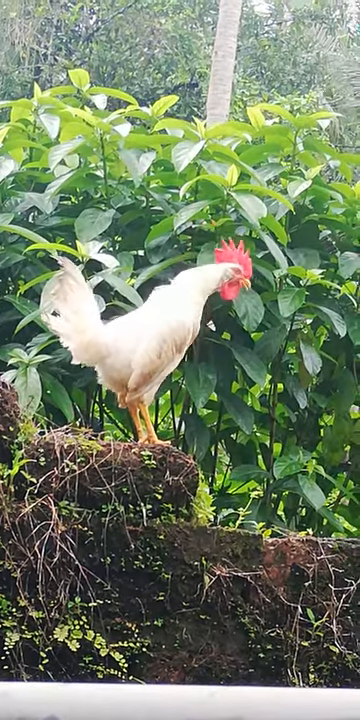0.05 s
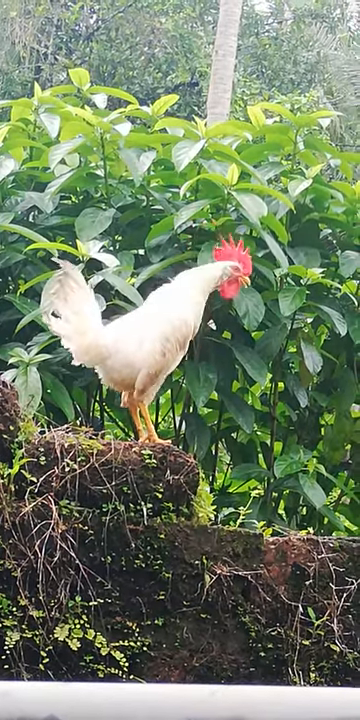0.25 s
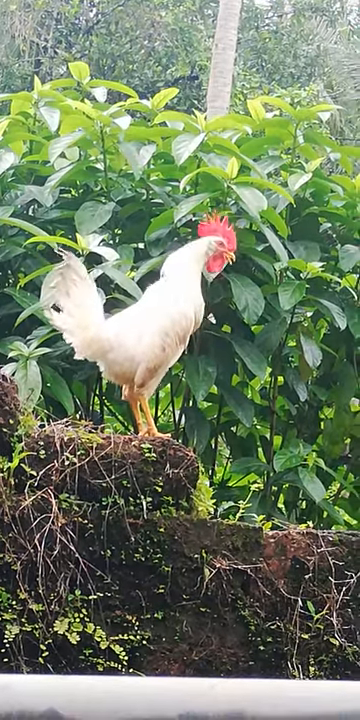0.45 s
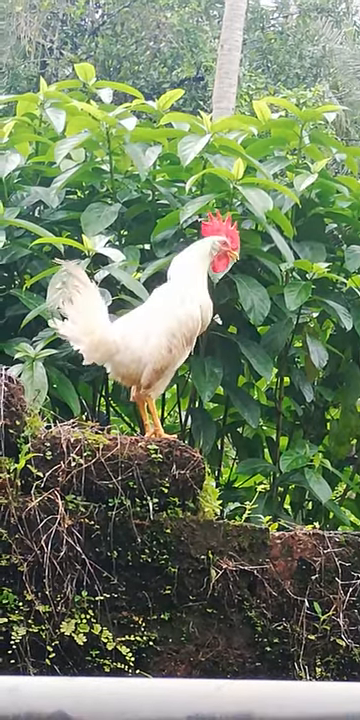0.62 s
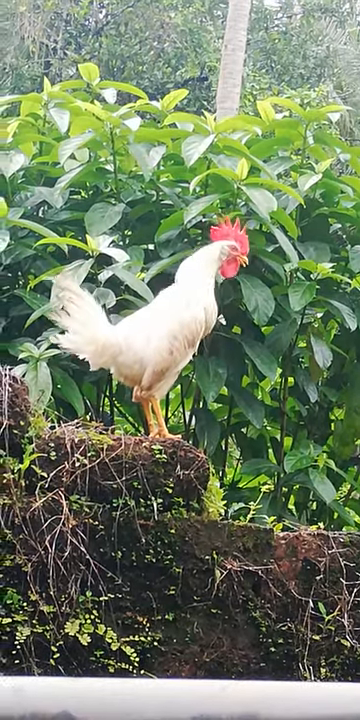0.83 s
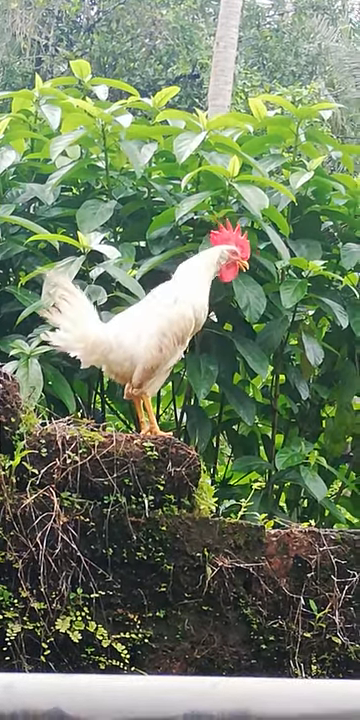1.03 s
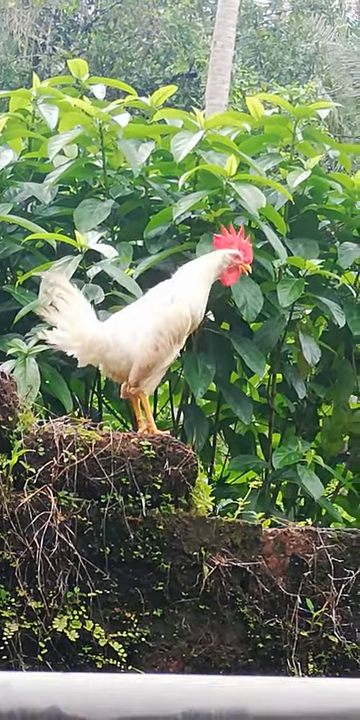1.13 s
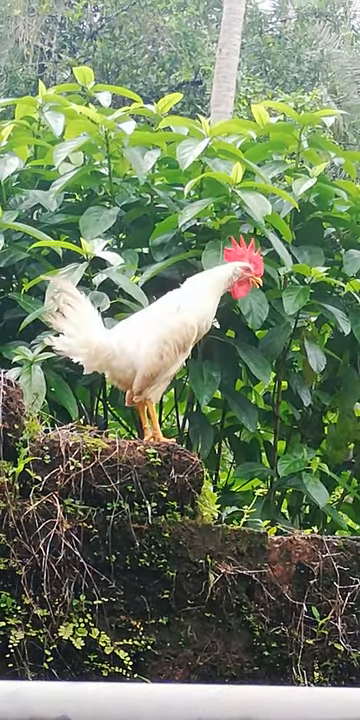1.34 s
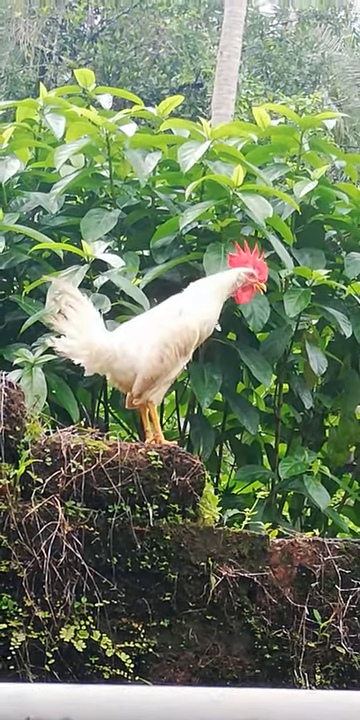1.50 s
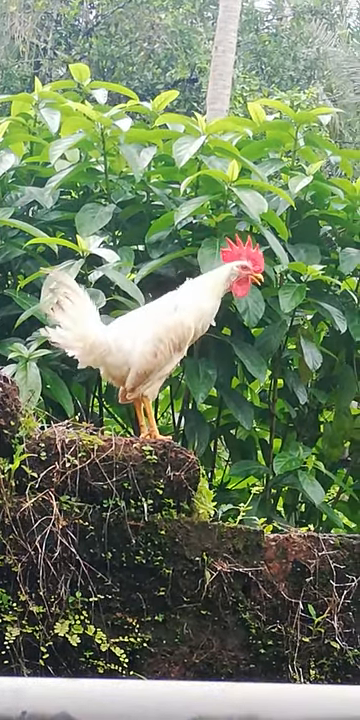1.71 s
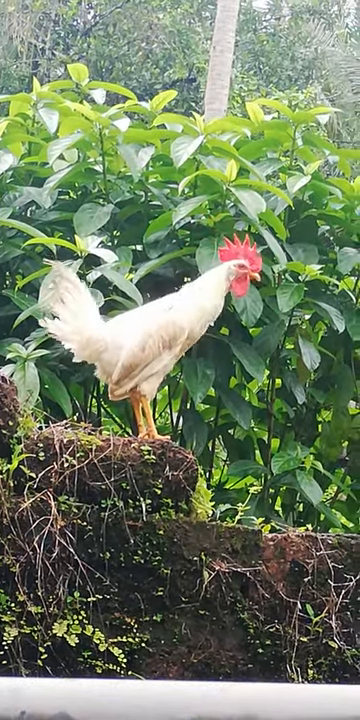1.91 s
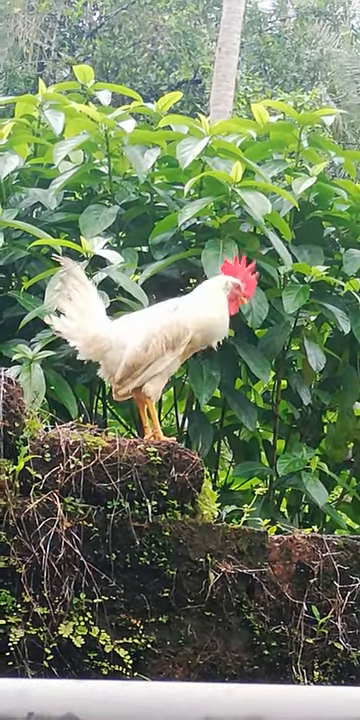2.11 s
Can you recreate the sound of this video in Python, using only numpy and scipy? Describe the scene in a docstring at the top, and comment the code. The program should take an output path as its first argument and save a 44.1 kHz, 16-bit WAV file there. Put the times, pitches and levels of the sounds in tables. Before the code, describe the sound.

A rooster crows once in a garden, a few metres away. A short hoarse note starts at about 0.2 seconds. From 0.6 seconds a long note follows, breaking into a rasp several times, then clearing to a steady tone around 1.2 seconds. It drops in pitch and ends at 1.8 seconds, leaving a short echo. Quiet outdoor air and faint insects continue underneath.

```python
"""A rooster crowing in a garden

One crow, a few metres away: a short hoarse note, then a long one that breaks into a rasp four times,
clears to a pure held tone and drops in pitch as the air runs out. Regular vibration of the syrinx gives
the tone, irregular pulses give the rasp, and throat and beak filter both. Walls and trees return a
short echo; behind it are quiet air, faint insects and a thin far-off tone."""
import sys
import numpy as np
from scipy import signal
from scipy.fft import rfft, irfft
from scipy.io import wavfile

SR = 44100
rng = np.random.default_rng(int(sys.argv[2]) if len(sys.argv) > 2 else 0)


def waveform_to_disk(signal):
    """Save audio, clipped to [-1, 1], as 16-bit WAV at the path in sys.argv[1]."""
    frames = np.transpose(np.atleast_2d(signal))
    scaled = np.clip(frames, -1, 1) * 32767
    samples = np.round(scaled).astype(np.int16)
    wavfile.write(sys.argv[1], SR, samples)


N = 94815

# Spectrum of the outdoor air. Each row: frequency in Hz, relative level in dB.
AIR_SPECTRUM = [(25, -1), (70, -2.5), (150, -5), (400, -9.5), (800, -11), (1400, -9.5), (3200, -16.5),
                (5500, -14), (8000, -16.5), (9500, -16.5), (10500, -29), (13000, -24.5), (15500, -46.5)]
# Partials of the far-off tone. Each row: frequency in Hz, level in dB.
FAR_PARTIALS = [(1061, -78.5), (1853, -66), (2589, -78.5)]
# Reflections from nearby surfaces. Each row: delay in seconds, gain in dB.
REFLECTIONS = [(.011, -15), (.047, -9), (.083, -20.5)]
# Spectrum of the diffuse echo. Each row: frequency in Hz, relative level in dB.
TAIL_SPECTRUM = [(600, 1.5), (870, 0.5), (1250, -5), (1750, 6.5), (2200, -3), (3200, 4.5), (7000, 11.5),
                 (12000, 2)]
# Throat and beak response in three postures. Each row: frequency in Hz, relative gain in dB.
THROAT_FIRST_NOTE = [(1900, -8.5), (2450, -17.5), (2950, 2), (3450, -3.5), (4000, -12), (4480, 1),
                     (4950, -11), (5600, 2), (6300, -12), (7200, -22), (8200, -9), (9200, -13.5),
                     (10000, -29.5), (10900, -28.5), (12000, -33), (16000, -56)]
THROAT_WIDE_OPEN = [(1800, -28.5), (2250, 15), (2500, 1.5), (2730, 2.5), (3020, -11), (3400, 11),
                    (3650, -20.5), (4100, -39.5), (4520, -7.5), (4760, 0.5), (5100, -3.5), (5500, 0.5),
                    (6400, -2.5), (7250, -0.5), (7850, -25), (8400, -11.5), (9200, -8), (9750, -20.5),
                    (10900, -18), (11800, -49), (14500, -41), (16000, -53)]
THROAT_CLOSING = [(1900, -32), (2650, -14.5), (3150, 14.5), (3550, -8), (3900, -21.5), (4420, -0.5),
                  (5300, -8), (6200, -4.5), (7050, -8.5), (7950, 0.5), (8800, -5.5), (9700, -10),
                  (10600, -29.5), (12400, -29.5), (16000, -53)]
# Movement of the beak. Each row: time in seconds, posture (0 first note, 1 wide open, 2 closing).
BEAK_POSTURE = [(.5, 0), (.585, 0.71), (.63, 0.21), (.67, 0.69), (.73, 1), (1.34, 1), (1.46, 1.6),
                (1.57, 2)]
# Resonances rung by the irregular pulses. Each row: frequency in Hz, width per pass in Hz, gain in dB.
RASP_RESONANCES = [(781.7, 100, -2), (934, 131, -5.5), (1179, 73, 1), (1480, 216, -8.5), (1809, 215, -4),
                   (1963, 98, -11)]
# Stretches of irregular vibration. Each row: start in seconds, end in seconds, attack in seconds,
# level in dB, treble boost in dB.
RASP_BREAKS = [(0.231, 0.235, 0.0045, -38.5, 0), (0.258, 0.311, 0.0077, -37.5, 3),
               (0.359, 0.41, 0.024, -30.5, -1.5), (.56, 0.597, 0.026, -28, -2),
               (0.712, 0.764, 0.0097, -30, -1), (0.895, .932, 0.0067, -29, 2),
               (1.014, 1.106, 0.0041, -29.5, 1.5), (1.794, 1.812, 0.0097, -37, 3)]
# Pitch of the syrinx. Each row: time in seconds, fundamental frequency in Hz.
SYRINX_PITCH = [(.232, 969), (.240, 1025), (.247, 714.5), (.266, 720.5), (.274, 860.3), (.30, 895.5),
                (.36, 892.2), (.45, 892), (.57, 788.2), (.588, 807.9), (.603, 929), (.635, 929.5),
                (.67, 938.2), (.72, 878), (.76, 875.6), (.81, 908.6), (.87, 916), (.96, 919.2),
                (1.02, 898.7), (1.16, 893), (1.25, 901), (1.33, 905.5), (1.44, 899.2), (1.6, 885.9),
                (1.75, 875), (1.788, 845), (1.802, 762), (1.814, 604)]
# Hoarseness of the voice. Each row: time in seconds, share from 0 to 1.
HOARSENESS = [(.23, .6), (.33, 0.56), (.44, 0.83), (.58, 0.68), (.64, 0.36), (.7, 0.37), (.77, 0.6),
              (.83, 0.42), (.88, 0.31), (.97, 0.51), (1.13, 0.51), (1.21, 0.09), (1.3, 0), (1.66, 0.06),
              (1.78, 0.1), (1.802, 0.74)]
# Envelopes of the two notes. Each row: time in seconds, then the levels in dB, before filtering and
# trim, of the fundamental, the second harmonic and the upper harmonics.
SHORT_NOTE_LEVELS = [(.232, -34, -45.5, -68), (.25, -28, -29, -51.5), (.275, -25.5, -38, -48),
                     (.32, -27.5, -26.5, -45.5), (.37, -35.5, -34, -45.5), (.41, -59, -65, -49.5),
                     (.45, -53, -72, -57)]
LONG_NOTE_LEVELS = [(.575, -41.5, -44.5, -61), (.61, -26, -28, -40), (.64, -21.5, -28.5, -39),
                    (.69, -28.5, -26, -37.5), (.725, -31.5, -53, -54), (.78, -26, -33, -40.5),
                    (.85, -31.5, -27, -35.5), (.88, -32, -27.5, -36), (.91, -46, -41, -53),
                    (.95, -27.5, -26, -39), (.99, -31.5, -31, -39.5), (1.04, -33, -40, -55),
                    (1.14, -31, -35.5, -44), (1.22, -30.5, -26.5, -37.5), (1.34, -24, -34, -37),
                    (1.41, -24.5, -36, -38.5), (1.465, -27, -22, -35), (1.51, -34, -31, -43),
                    (1.62, -24, -29, -39), (1.66, -21, -40.5, -46), (1.695, -22.5, -22.5, -39.5),
                    (1.74, -27.5, -37.5, -39), (1.77, -26, -34, -37.5), (1.79, -28, -31, -43.5),
                    (1.804, -29, -42, -48), (1.815, -36, -28.5, -38)]
FUNDAMENTAL, SECOND, UPPER = 1, 2, 3  # columns of the note envelopes

TIME_S, BIN_HZ = np.arange(N) / SR, np.fft.rfftfreq(N, 1 / SR)


def undb(db):
    """Amplitude grows tenfold for every 20 dB."""
    return 10 ** (np.asarray(db) / 20)


def unit(x):
    """Normalisation to an rms of 1."""
    return x / np.sqrt(np.mean(x ** 2))


def curve(rows, column=1):
    """Linear interpolation of one column of a table in time."""
    rows = np.array(rows)
    return np.interp(TIME_S, rows[:, 0], rows[:, column])


def response(points):
    """Frequency response from a (Hz, dB) outline, interpolated in log frequency."""
    points = np.array(points)
    return undb(np.interp(np.log(BIN_HZ + 1), np.log(points[:, 0]), points[:, 1]))


def coloured_noise(gain):
    """Filtered white noise takes on the spectrum of the filter."""
    return irfft(rfft(rng.standard_normal(N)) * gain, N)


def wander(hz):
    """Low-passed noise of rms 1 fluctuates smoothly, up to about the given rate."""
    return unit(coloured_noise(1 / (1 + (BIN_HZ / hz) ** 2) ** 2))


def ring(x, hz, width_hz):
    """Two passes through a resonator give a peak with steep skirts."""
    b, a = signal.iirpeak(hz, hz / width_hz, fs=SR)
    return signal.lfilter(b, a, signal.lfilter(b, a, x))


def noise_band(hz, width_hz):
    """A resonator driven by white noise gives a band of noise, here of rms 1."""
    return unit(ring(rng.standard_normal(N), hz, width_hz))


def high_pass(x, hz, order=4):
    """A high-pass filter attenuates what lies below its cutoff."""
    return signal.sosfilt(signal.butter(order, hz, "high", fs=SR, output="sos"), x)


def background():
    """Bandwidth sets timbre: broad noise for air, a high band for insects, narrow ones for a far tone."""
    air = unit(coloured_noise(response(AIR_SPECTRUM)))
    insects = noise_band(hz=8850, width_hz=1300) * undb(1.5 * wander(hz=14))
    far_tone = sum(undb(db) * noise_band(hz, width_hz=22) for hz, db in FAR_PARTIALS)
    return undb(-63) * air + undb(-73) * insects + far_tone


def garden_echo(direct, low_t60_s=.55, treble_t60_s=.42, build_s=.026):
    """Reflection gives distinct echoes; scattering by trees gives a tail that dies sooner in the treble."""
    def decay(t60_s):
        return np.exp(-np.log(1000) * TIME_S / t60_s) * (1 - np.exp(-TIME_S / build_s))

    scatter = coloured_noise(response(TAIL_SPECTRUM))
    low = signal.sosfiltfilt(signal.butter(2, 3000, fs=SR, output="sos"), scatter)
    tail = low * decay(low_t60_s) + (scatter - low) * decay(treble_t60_s)
    tail /= np.linalg.norm(decay(low_t60_s))
    early = sum(undb(db) * np.interp(TIME_S - delay, TIME_S, direct, left=0) for delay, db in REFLECTIONS)
    return direct + early + undb(-10.5) * signal.fftconvolve(direct, tail)[:N]


def throat(source):
    """Source and filter: the resonances of throat and beak colour the treble and change with posture."""
    posture = np.clip(curve(BEAK_POSTURE), 0, 2)
    out = 0
    for k, shape in enumerate((THROAT_FIRST_NOTE, THROAT_WIDE_OPEN, THROAT_CLOSING)):
        weight = np.maximum(1 - abs(posture - k), 0)
        out += weight * irfft(rfft(source) * unit(response(shape)), N)
    return out


def note_envelope(column, edge_s=.004):
    """Amplitude envelope of one part of the voice over both notes, zero outside them."""
    envelope = 0
    for note in (SHORT_NOTE_LEVELS, LONG_NOTE_LEVELS):
        inside_s = np.minimum(TIME_S - note[0][0], note[-1][0] - TIME_S)
        envelope += undb(curve(note, column)) * np.clip(inside_s / edge_s, 0, 1)
    return envelope


def syrinx_pulses(period_scatter=.2, size_scatter_db=3.5):
    """Aperiodic vibration: the syrinx slaps about once a cycle, uneven in timing and strength."""
    period_draw, size_draw = rng.standard_normal(size=(2400, 2)).T
    pulse_cycles = np.cumsum(np.exp(period_scatter * period_draw))
    elapsed_cycles = np.cumsum(curve(SYRINX_PITCH)) / SR
    onsets = np.interp(pulse_cycles, elapsed_cycles, np.arange(N), right=N).astype(int)
    return np.bincount(onsets, undb(size_scatter_db * size_draw), N + 1)[:N]


def rasp(release_s=.012):
    """Impulse excitation: irregular slaps ring the throat, loud in the breaks, faint in hoarse voice."""
    pulses = syrinx_pulses()
    resonances = sum(undb(db) * ring(pulses, hz, width) for hz, width, db in RASP_RESONANCES)
    bass_leak = undb(-37) * unit(ring(pulses, hz=330, width_hz=300))
    body = unit(high_pass(resonances, hz=557)) + bass_leak
    turbulence = unit(unit(pulses) + 1.1 * rng.standard_normal(N))
    treble = undb(-9.5) * throat(high_pass(turbulence, hz=1800))
    hiss = high_pass(treble, hz=4800)
    upper_envelope = note_envelope(UPPER)
    effort = np.sqrt(upper_envelope / upper_envelope.max())
    out = undb(-46.5) * curve(HOARSENESS) * effort * (body + undb(8) * hiss)
    out += undb(-48) * effort * hiss  # airflow through the open beak
    for start, end, attack_s, db, treble_db in RASP_BREAKS:
        attack = np.clip((TIME_S - start) / attack_s, 0, 1)
        release = np.exp(-np.maximum(TIME_S - end, 0) / release_s)
        out += undb(db) * attack * release * (body + undb(treble_db) * treble)
    return out


def clear_voice(jitter=.01393, tremor=.00047, shimmer=.25, smear_rad=.14, swell_db=4):
    """Periodic vibration of the syrinx gives harmonics; hoarseness modulates their phase and level."""
    hoarse = np.clip(curve(HOARSENESS), 0, 1)
    pitch_hz = curve(SYRINX_PITCH) * (1 + jitter * hoarse * wander(hz=384) + tremor * wander(hz=46))
    phase = 2 * np.pi * np.cumsum(pitch_hz) / SR
    low = note_envelope(FUNDAMENTAL) * np.sin(phase) + note_envelope(SECOND) * np.cos(2 * phase)
    harmonics = 0
    for k in range(3, 19):  # each upper harmonic swells and fades separately
        swell = undb(swell_db * wander(hz=4.7))
        smear = rng.uniform(0, 2 * np.pi) + k * smear_rad * hoarse * wander(hz=350)
        harmonics += swell * np.sin(k * phase + smear)
    flutter_db = 6.5 * np.minimum(hoarse, .4) * noise_band(hz=46.1, width_hz=29)  # the treble throbs
    upper = note_envelope(UPPER) * undb(flutter_db - 2.5) * throat(unit(harmonics))
    voice = (np.sqrt(2) * low + upper) * (1 + shimmer * hoarse * wander(hz=180))
    return high_pass(voice, hz=500, order=6)  # the small throat radiates little bass


def scene():
    """Superposition: the crow, its echo and the background add in one channel."""
    crow = clear_voice() + rasp()
    return (garden_echo(crow) + background())[None]


def record(dry, cutoff_hz=15650):
    """Band limiting: a steep low-pass filter removes the highest treble."""
    return signal.sosfilt(signal.ellip(10, .1, 80, cutoff_hz, fs=SR, output="sos"), dry)


dry = scene()
out = record(dry)
waveform_to_disk(out)
```